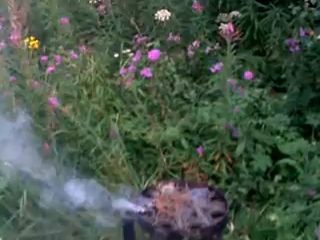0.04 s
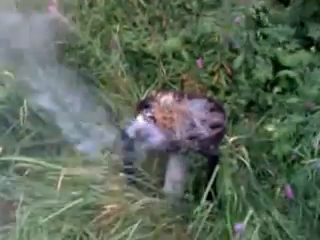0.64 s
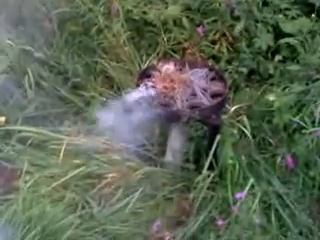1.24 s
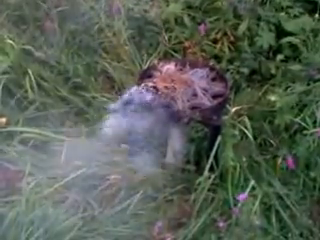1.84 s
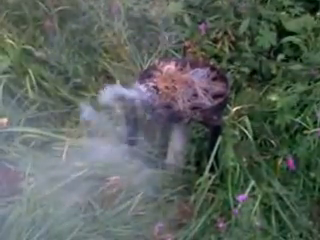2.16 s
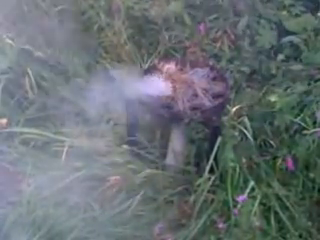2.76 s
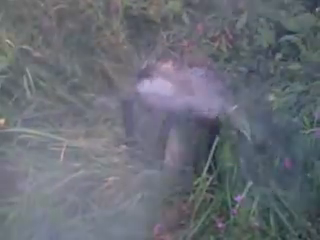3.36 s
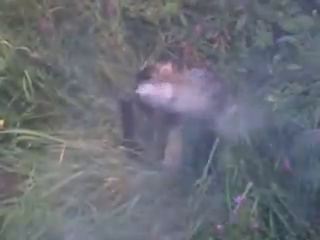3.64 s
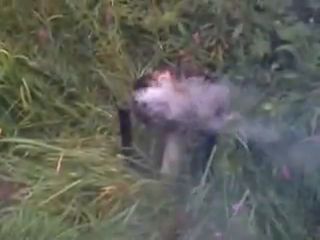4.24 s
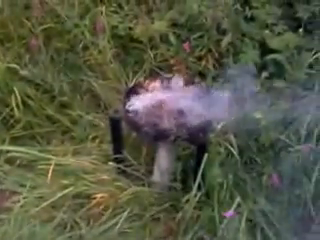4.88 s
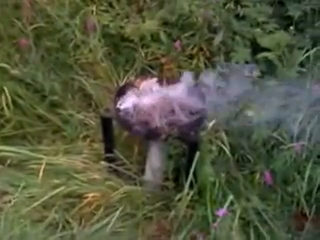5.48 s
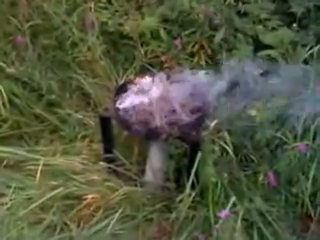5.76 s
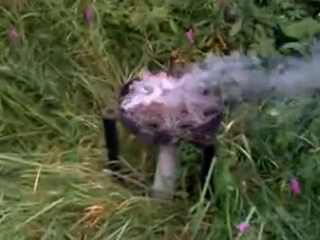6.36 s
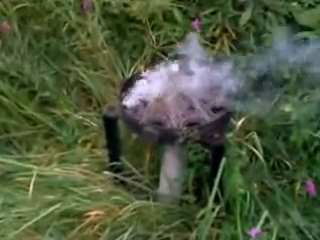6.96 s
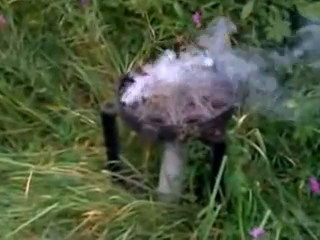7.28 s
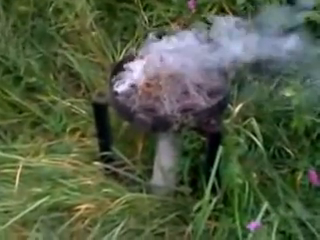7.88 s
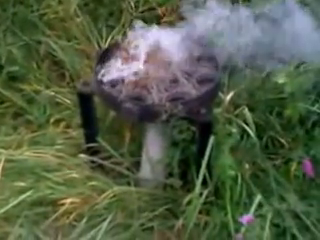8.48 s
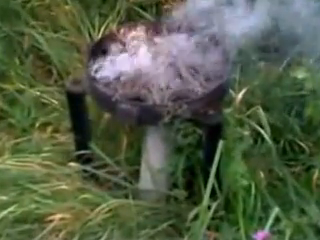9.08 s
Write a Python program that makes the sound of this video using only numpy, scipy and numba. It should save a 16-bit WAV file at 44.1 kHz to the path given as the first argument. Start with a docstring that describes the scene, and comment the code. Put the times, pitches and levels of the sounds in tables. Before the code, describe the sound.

Dry grass smoulders with sparse small snaps over a faint outdoor hiss, while wind buffets the microphone at first and then dies away.

```python
"""A meadow: dry grass smoulders in a small iron pot. Stalks snap now and then, each with a short ring,
a sharp edge and a thud from the pot's hollow; thin fibres tick faintly between.
Gusts buffet the hand-held microphone with low eddies for the first seconds, then die away.
Under it all: an even outdoor hiss and the firing hum of a far engine that slowly gains speed."""
import sys
import numpy as np
from scipy import signal
from scipy.fft import rfft, irfft
from scipy.io import wavfile
from scipy.ndimage import uniform_filter1d
from numba import njit

SR = 44100
rng = np.random.default_rng(int(sys.argv[2]) if len(sys.argv) > 2 else 0)


def generate_wav(signal):
    """Clip the signal to [-1, 1] and save it as 16-bit WAV at the path in sys.argv[1]."""
    frames = np.transpose(np.atleast_2d(signal))
    scaled = np.clip(frames, -1, 1) * 32767
    pcm = np.round(scaled).astype(np.int16)
    wavfile.write(sys.argv[1], SR, pcm)


N = 402191
TIME_S = np.arange(N) / SR

# snapping stalks: start_s, level_db, edge_db, thud_db, stalk_semitones, edge_semitones, damping_ratio
SNAPS = [(0.548, -32, -14, -28, -2, 0, 1), (0.625, -31, -18, -28, 2.5, -2, 0.8),
         (0.6393, -32, -18, -28, 2, 2, 0.6), (0.6530, -31, -18, -28, 1.5, 0, 0.9),
         (1.8805, -22.5, -11, -18, -1.7, 2, 0.72), (1.8858, -13, -4.5, -18, 1, 1.1, 2.7),
         (4.1329, -28.5, -9.5, -24, -0.1, 3.5, 0.65), (4.355, -39, -18, -20, -2, 0, 0.8),
         (4.8806, -32, -16, -12, -4, -0.6, 1.6), (4.8897, -31.5, -11, -9, 1.5, 6, 1),
         (4.9068, -27, -14, -8, -1, -2, 0.85), (4.9127, -20.5, 6.5, -3, -1.5, 1.4, 1.7),
         (5.4678, -31.5, -8, -19, 0.3, 5.5, 0.9), (6.785, -29.5, -10, -23, 0.5, 6, 0.81),
         (8.2158, -28.5, -10, -13, 0.6, 5, 0.8), (8.4461, -23, -4, -4, 0, -1.5, 1.2),
         (8.8474, -15, -8, -2, -0.5, -1, 1.2)]
# ring of a dry stalk: pitch_hz, width_hz, gain_db
STALK_MODES = [(1620, 580, 5), (2890, 540, 8), (3210, 660, 9.5), (4120, 600, -3)]
# sharp edge of the fracture: pitch_hz, width_hz, gain_db
EDGE_MODES = [(5610, 1300, 7), (6920, 840, -1), (9200, 720, -1)]
# hollow of the pot: pitch_hz, width_hz, gain_db
POT_MODES = [(444, 160, -10), (782, 170, -1), (1740, 400, -5.5)]
# tuft catching: start_s, length_s, level_db
TUFT_FLURRIES = [(3.866, 0.055, -41)]
# gusts on the microphone: start_s, hold_s, level_db, corner_hz
MIC_GUSTS = [(0.388, 0.068, -18.5, 143), (1.036, 0.087, -29.5, 153), (1.235, 0.2, -22, 338),
             (1.299, 0.0043, -19.5, 417), (1.95, 0.083, -38, 134), (2.344, 0.14, -29.5, 137),
             (2.422, 0.19, -27.5, 223), (2.82, 0.325, -34, 131), (2.971, 0.11, -32, 243),
             (3.234, 0.051, -39, 163), (3.503, 0.035, -38.5, 110)]
# lulls in the breeze: centre_s, half_length_s, change_db
BREEZE_LULLS = [(1.52, 0.072, -15), (1.752, 0.065, -10), (2.158, 0.088, -9.5), (4.25, 0.51, -13.5)]
# thumps of the hardest eddies: centre_s, level_db, swing_hz
EDDY_THUMPS = [(0.333, -19, 121), (0.387, -10.5, 65), (0.413, -9.5, 81), (0.439, -13, 69),
               (0.46, -11.5, 60), (0.7, -23.5, 124), (0.873, -15, 97), (0.973, -21, 109),
               (1.014, -18.5, 97), (1.088, -17, 102), (1.245, -11.5, 135), (1.282, -1.5, 100),
               (1.289, -5, 192), (1.299, -3.5, 248), (1.313, -12.5, 240), (1.32, -10, 134),
               (1.338, -13.5, 196), (1.355, -6.5, 198), (1.418, -9.5, 116), (1.432, -12, 82.6),
               (1.893, -30, 124), (1.955, -21, 96), (2.043, -27, 81.6), (2.337, -22.5, 81),
               (2.364, -21, 85), (2.428, -18.5, 113), (2.474, -18.5, 138), (2.499, -13, 98),
               (2.549, -18, 164), (2.602, -17.5, 109), (2.638, -20, 103), (2.904, -22.5, 84),
               (2.981, -20.5, 172), (3.003, -25, 230), (3.046, -21, 124), (3.155, -20.5, 119),
               (3.307, -29, 133), (3.466, -23.5, 99), (3.58, -30, 55), (3.731, -34, 58), (3.759, -37, 65),
               (3.968, -33.5, 45), (4.014, -34, 66), (4.171, -36, 67.4), (4.357, -34, 50.3),
               (4.642, -36, 94)]
# base level of both hiss bands: time_s, level_db
HISS_LEVELS = [(0.55, -44.5), (1.0, -47.5), (1.45, -48.5), (2.4, -53.5), (3.4, -57), (3.9, -55.5),
               (4.4, -56.5), (5.4, -52.5), (6.7, -51), (8.0, -50), (8.6, -49.5), (9.12, -50.5)]
# broad rush of open air: freq_hz, density_db
RUSH_SPECTRUM = [(20, -0.5), (45, 8.5), (70, 11.5), (105, 1), (160, 0.5), (260, 3), (480, -2), (620, -0.5),
                 (1000, 0), (1750, 0), (2200, -6), (2800, -20.5), (4500, -45.5)]
# rush swelling as air stirs the meadow: centre_s, half_length_s, change_db
RUSH_SWELLS = [(6.75, 0.18, 1.3), (7.9, 0.23, 1.5)]
# fine hiss: freq_hz, density_db
FINE_SPECTRUM = [(300, -0.5), (1000, -5.5), (2200, 0), (2850, -2), (3400, 0), (4300, -0.5), (5000, -4),
                 (5800, -5), (7000, -8.5), (8300, -11.5), (9300, -19), (10000, -28.5)]
# far engine's firing tone: time_s, level_db
ENGINE_LEVELS = [(0.3, -41), (3.9, -51.5), (4.6, -55), (5.4, -49.5), (7.0, -52.5), (9.1, -55.5)]


def embers(tick_max_db=-43, tick_count=24):
    """Stalks snap; thin fibres tick at random moments."""
    out = np.zeros(N)
    for start_s, *settings in SNAPS:
        add(out, start_s, snap(*settings))
    for when, size in rng.random((tick_count, 2)):
        add(out, when * N / SR, size * snap(tick_max_db, edge_db=-28, thud_db=-29))
    return out


def snap(level_db, edge_db, thud_db, stalk_semitones=0, edge_semitones=0, damping=1, pot_lag_s=0.000736):
    """One stalk breaks: brief ring, sharp edge, then the pot's thud; peak near level_db."""
    t = np.arange(SR // 50) / SR
    stalk = ring(STALK_MODES, t, scatter=0.012, rise_s=0.00025, semitones=stalk_semitones, damping=damping)
    edge = ring(EDGE_MODES, t, scatter=0.02, rise_s=0.00008, semitones=edge_semitones)
    crack = lowpass(stalk, hz=4900) + undb(edge_db) * lowpass(edge, hz=8400)
    # fainter snaps come from thinner stalks, which lack the low ring
    low_cut_hz = np.clip(1100 * 2 ** ((-17 - level_db) / 16), 600, 2600)
    crack = highpass(crack, low_cut_hz)
    tear = smear(crack, t, decay_s=0.0022)  # last fibres part
    tail = smear(crack, t, decay_s=0.0042)  # scatter off the grass around
    crack = crack + np.std(crack) * (undb(-11) * tear + undb(-22) * tail)
    thud = ring(POT_MODES, np.maximum(t - pot_lag_s, 0), scatter=0.0097, rise_s=0.00028)
    return undb(level_db) * (crack + undb(thud_db) * thud) / np.abs(crack).max()


def ring(modes, t, scatter, rise_s, semitones=0, damping=1):
    """Damped modes, slightly detuned at each blow; rms 1."""
    hz, width_hz, gain_db = np.transpose(modes)[:, :, None]
    hz = hz * 2 ** (semitones / 12) * (1 + scatter * rng.standard_normal(hz.shape))
    decay = np.exp(-np.pi * width_hz * damping * t)
    partials = undb(gain_db) * np.sqrt(width_hz) / hz * decay * np.sin(2 * np.pi * hz * t)
    motion = partials.sum(axis=0) * (1 - np.exp(-t / rise_s))
    # a small body radiates the change of its motion: no bass
    return unit(np.diff(motion, prepend=0))


def flurries(spread_db=5, count=6):
    """A tuft catches: neighbouring fibres break in a quick, uneven run."""
    out = np.zeros(N)
    for start_s, length_s, level_db in TUFT_FLURRIES:
        for k, (late, size) in enumerate(rng.random((count, 2))):
            tick = snap(level_db + spread_db * (size - .5), edge_db=-15, thud_db=-35)
            add(out, start_s + length_s * (k + late) / count, tick)
    return out


def wind(trim_db=-1, flutter_db=2.0, soft_limit=0.7):
    """Turbulence at the microphone: each gust's rumble brightens as it swells and dulls as it fades."""
    strength, corner_hz = airflow()
    corner_hz = np.clip(corner_hz, 70, 900)
    eddies = lowpass(rng.standard_normal(N), hz=70, order=1)
    eddies = swept_lowpass(swept_lowpass(eddies, corner_hz), corner_hz)
    eddies = highpass(eddies, hz=44)
    # level independent of brightness
    eddies /= np.sqrt(uniform_filter1d(eddies ** 2, size=SR // 14) + 1e-18)
    pressure, cover = buffets()
    flutter = undb(trim_db + flutter_db * walk(rate_hz=32))
    rumble = eddies * strength * flutter * (1 - .5 * cover) + pressure
    # soft limiter rounds off the loudest wind thumps
    return soft_limit * np.tanh(highpass(rumble, hz=25.8) / soft_limit)


def airflow(breeze_db=-29, breeze_corner_hz=127, calm_s=4.77, puff_db=0.5, db_per_octave=22):
    """Fading breeze plus gusts, each with its own brightness: joint strength and corner_hz."""
    swell_db = puff_db * walk(rate_hz=13) + bumps_db(BREEZE_LULLS)
    fade_db = 3.5 * TIME_S + 33 * np.maximum(TIME_S - calm_s, 0)
    power = undb(breeze_db - fade_db + swell_db) ** 2
    weighted_corner = power * breeze_corner_hz * 2 ** ((swell_db - fade_db / 2) / db_per_octave)
    for start_s, hold_s, level_db, corner_hz in MIC_GUSTS:
        shape = gust_shape(start_s, hold_s)
        gust_power = (undb(level_db) * shape) ** 2
        power += gust_power
        weighted_corner += gust_power * corner_hz * shape ** (20 * np.log10(2) / db_per_octave)
    return np.sqrt(power), weighted_corner / power


def gust_shape(start_s, hold_s, attack_s=0.029, release_s=0.028):
    """A gust builds up to start_s, holds and dies away; 0-1."""
    t = TIME_S - start_s
    return np.exp(np.minimum(t, 0) / attack_s - np.maximum(t - hold_s, 0) / release_s)


def buffets(full_core=0.43, core_ratio=2.01, hard_db=-10, db_per_halving=7):
    """Large single eddies: their pressure, and how far they sweep small eddies aside (cover, 0-1)."""
    pressure, cover = np.zeros(N), np.zeros(N)
    t = np.arange(-SR // 40, SR // 40) / SR
    signs = np.sign(rng.standard_normal(len(EDDY_THUMPS)))
    for (centre_s, level_db, swing_hz), sign in zip(EDDY_THUMPS, signs):
        phase = 2 * np.pi * swing_hz * t
        swing = np.cos(phase) * np.exp(-phase ** 2 / 15)  # one push, two weaker rebounds
        core_phase = core_ratio * phase
        core = (1 - core_phase ** 2 / 2) * np.exp(-(core_phase / 2) ** 2)
        # weaker eddies are rounder
        core_gain = full_core * 2 ** (min(level_db - hard_db, 0) / db_per_halving)
        thump = (swing + core_gain * core) / (1 + core_gain / 2)
        add(pressure, centre_s + t[0], sign * undb(level_db) * thump)
        add(cover, centre_s + t[0], np.exp(-phase ** 2 / 20))
    return pressure, np.minimum(cover, 1)


def hiss(rush_db=3.0, fine_db=0.52, fine_fade_db_per_s=0.42, waver_db=0.73):
    """Broad rush of open air and a finer hiss that slowly loses ground to it; both waver."""
    base_db = curve(HISS_LEVELS)
    rush = noise(RUSH_SPECTRUM) * undb(base_db + rush_db + bumps_db(RUSH_SWELLS))
    rush *= undb(waver_db * walk(rate_hz=3.0))
    fine = noise(FINE_SPECTRUM) * undb(base_db + fine_db - fine_fade_db_per_s * TIME_S)
    fine *= undb(waver_db * walk(rate_hz=21))
    return rush + fine


def engine(start_hz=68.86, rise_hz_per_s=0.9, second_db=-19, waver_db=2.0):
    """Far engine: only three firing harmonics carry, each wavering in the moving air."""
    level_db = curve(ENGINE_LEVELS)
    firing_hz = start_hz + rise_hz_per_s * TIME_S
    phase = 2 * np.pi * np.cumsum(firing_hz) / SR
    # the third harmonic sweeps through a resonance
    boom_hz, boom_width_hz, boom_db = 223.7, 2.8, -4.5
    third_gain = undb(boom_db) / np.hypot(1, 2 * (3 * firing_hz - boom_hz) / boom_width_hz)
    hum = np.zeros(N)
    for k, gain in enumerate([1, undb(second_db), third_gain], 1):
        rms = gain * undb(level_db + waver_db * walk(rate_hz=2.4))
        hum += np.sqrt(2) * rms * np.sin(k * phase)
    return hum


def undb(db):
    """Decibels to gain."""
    return 10 ** (np.asarray(db) / 20)


def unit(x):
    """Scale to rms 1."""
    return x / np.sqrt(np.mean(x ** 2))


def add(out, start_s, sound):
    """Mix a short sound in."""
    i = int(np.clip(start_s * SR, 0, N - 1))
    out[i:i + len(sound)] += sound[:N - i]


def curve(table):
    """(time_s, value) points to a value per sample."""
    return np.interp(TIME_S, *np.transpose(table))


def bumps_db(table):
    """Gaussian rises and dips in level, per sample."""
    return sum(db * np.exp(-((TIME_S - centre_s) / half_s) ** 2) for centre_s, half_s, db in table)


def noise(spectrum):
    """Noise coloured by (freq_hz, density_db) points; rms 1."""
    hz, db = np.transpose(spectrum)
    bins_hz = np.maximum(np.arange(N // 2 + 1) * SR / N, 1)
    gain = undb(np.interp(np.log(bins_hz), np.log(hz), db))
    return unit(irfft(rfft(rng.standard_normal(N)) * gain, N))


def walk(rate_hz):
    """Smooth random drift up to about rate_hz; rms 1."""
    bins_hz = np.arange(N // 2 + 1) * SR / N
    return unit(irfft(rfft(rng.standard_normal(N)) * np.exp(-(bins_hz / rate_hz) ** 2), N))


def smear(x, t, decay_s):
    """Convolve with a decaying noise burst; rms 1."""
    burst = rng.standard_normal(len(t)) * np.exp(-t / decay_s)
    return unit(np.convolve(burst, x)[:len(t)])


def highpass(x, hz, order=2):
    """Bass cut."""
    return signal.sosfilt(signal.butter(order, hz, "high", fs=SR, output="sos"), x)


def lowpass(x, hz, order=4):
    """Treble cut."""
    return signal.sosfilt(signal.butter(order, hz, fs=SR, output="sos"), x)


def steep_lowpass(x, hz):
    """Elliptic treble cut."""
    return signal.sosfilt(signal.ellip(8, .2, 70, hz, fs=SR, output="sos"), x)


@njit
def swept_lowpass(x, hz):
    """State-variable low-pass, one corner per sample."""
    y, band_state, low_state = np.empty(len(x)), 0., 0.
    for i in range(len(x)):
        g = np.tan(np.pi * hz[i] / SR)
        band = (band_state + g * (x[i] - low_state)) / (1 + g * (g + 1.4))
        y[i] = low_state + g * band
        band_state, low_state = 2 * band - band_state, 2 * y[i] - low_state
    return y


def scene():
    """All sources at one microphone."""
    return (embers() + flurries() + wind() + hiss() + engine())[None]


def record(dry, start_s=0.3075, muffle_hz=9700, leak_db=-16, top_hz=13900):
    """Sound switches on at start_s; only a trace of treble passes above muffle_hz."""
    sound = dry * (TIME_S >= start_s)
    trace = undb(leak_db) * highpass(sound, muffle_hz, order=8)
    return steep_lowpass(steep_lowpass(sound, muffle_hz) + trace, top_hz)


dry = scene()
out = record(dry)
generate_wav(out)
```